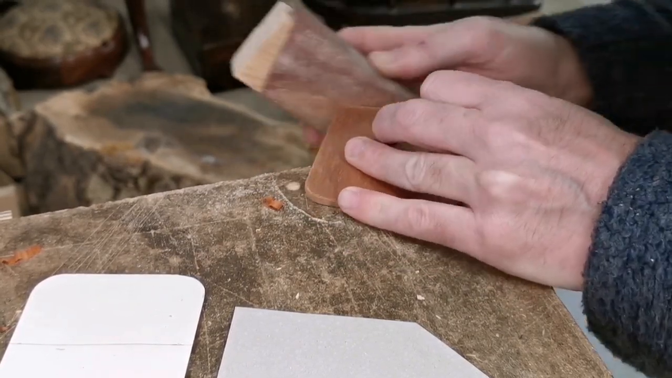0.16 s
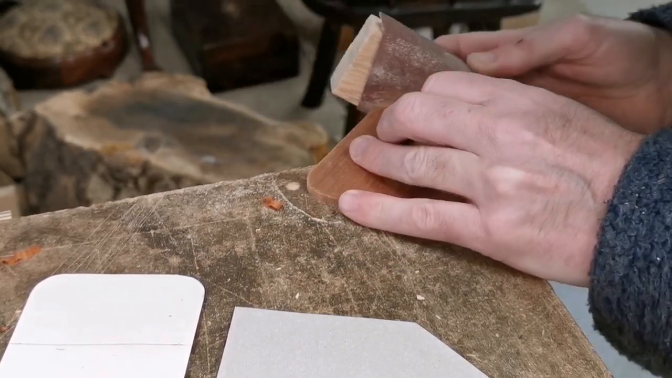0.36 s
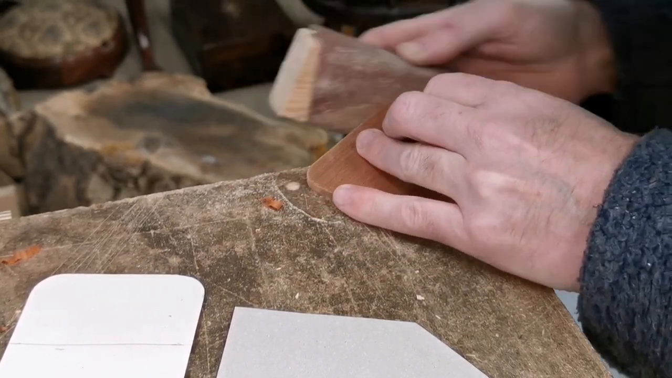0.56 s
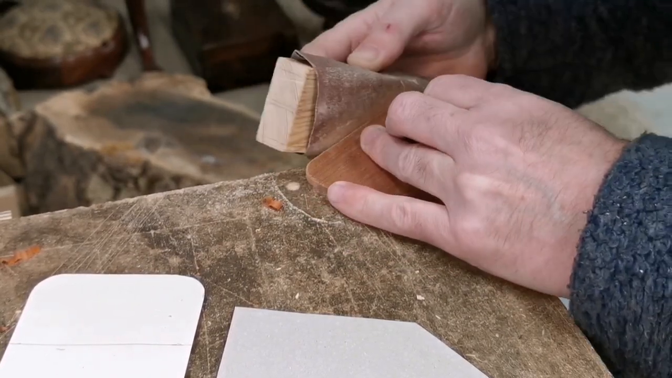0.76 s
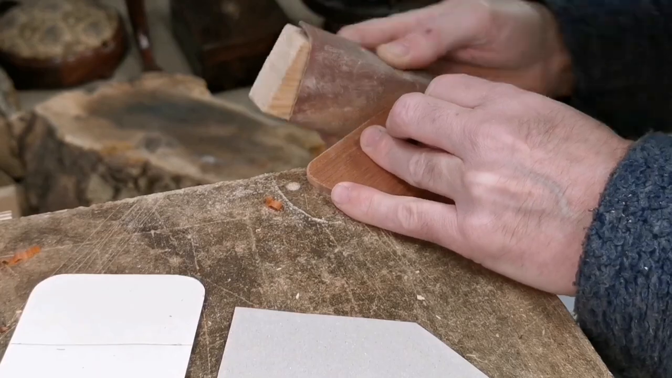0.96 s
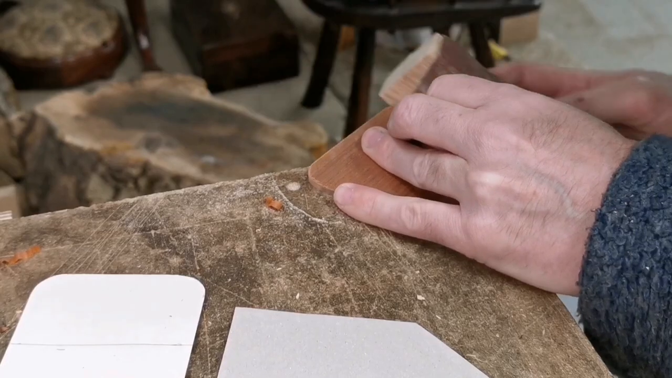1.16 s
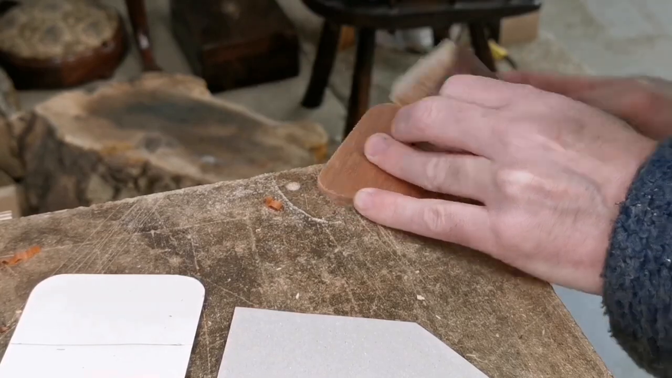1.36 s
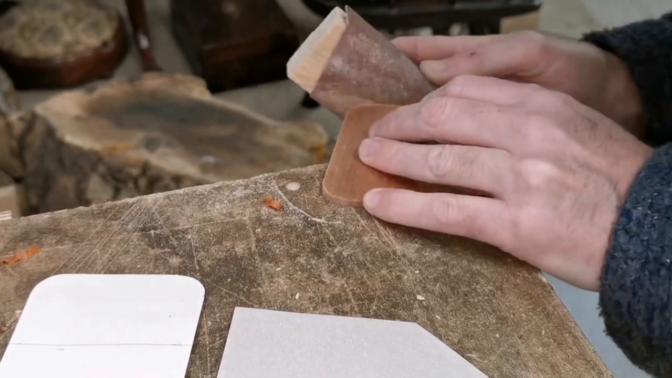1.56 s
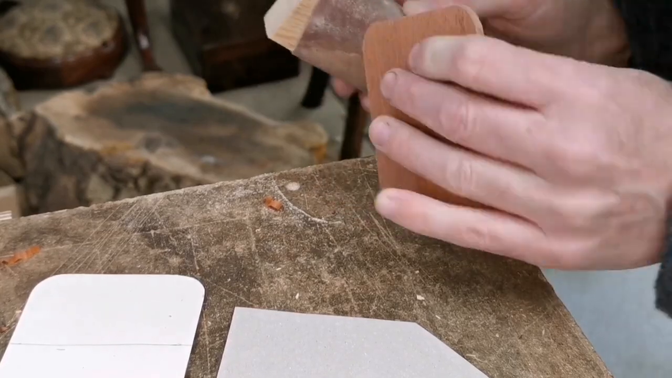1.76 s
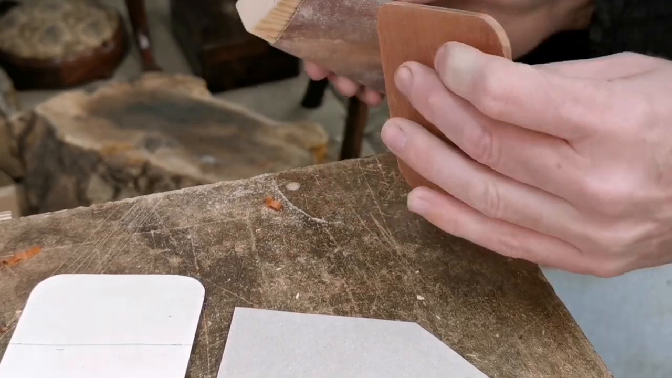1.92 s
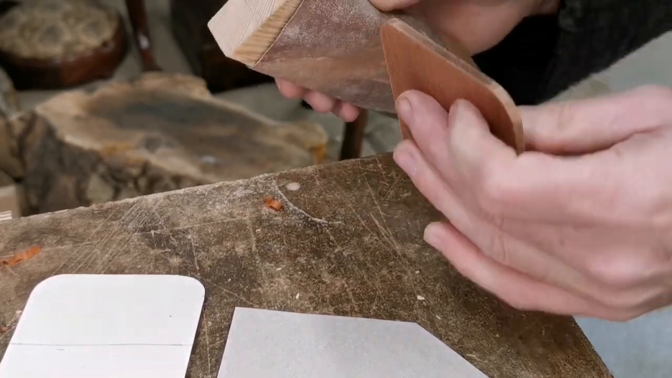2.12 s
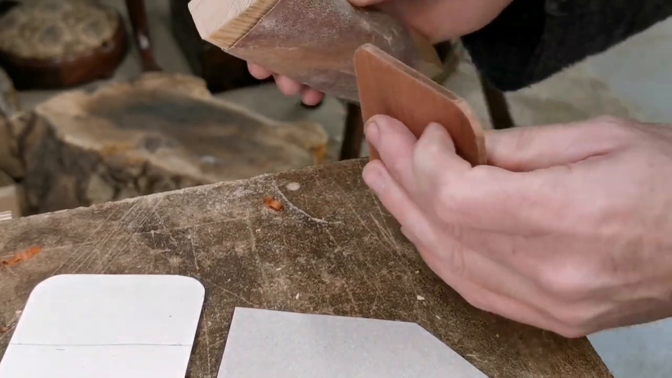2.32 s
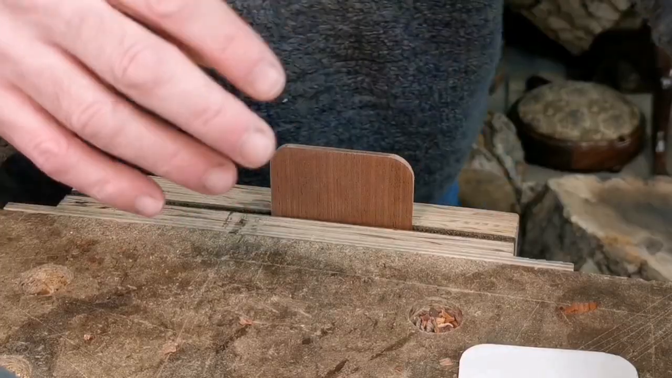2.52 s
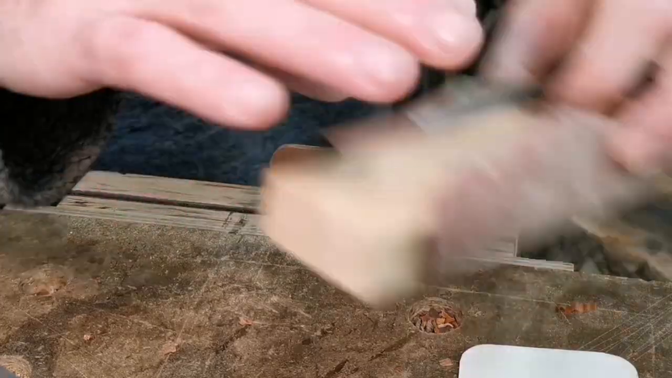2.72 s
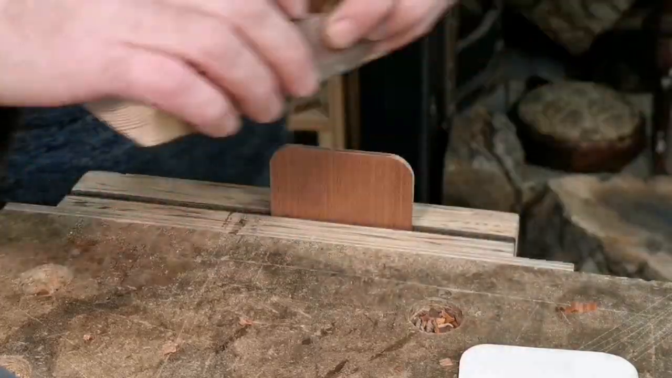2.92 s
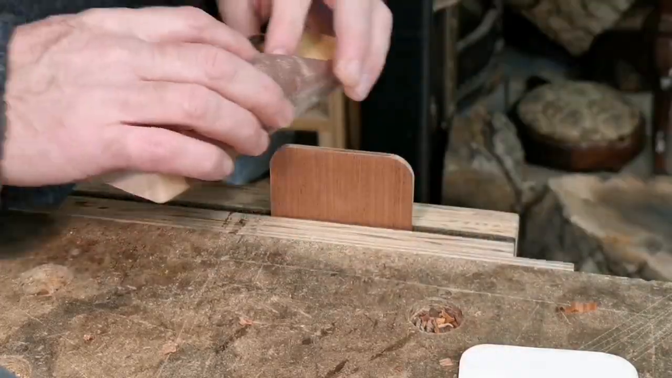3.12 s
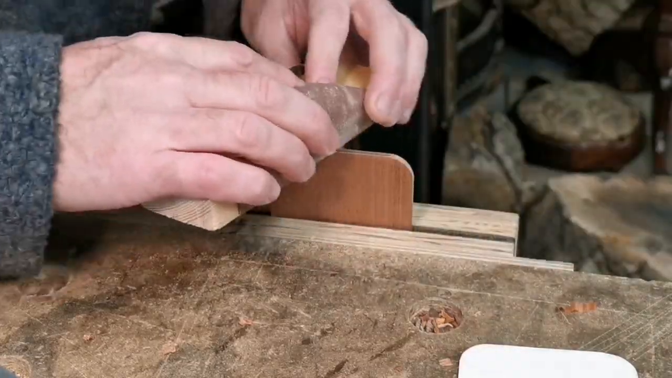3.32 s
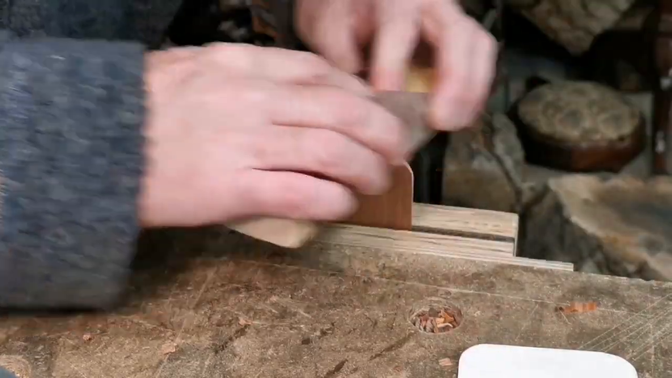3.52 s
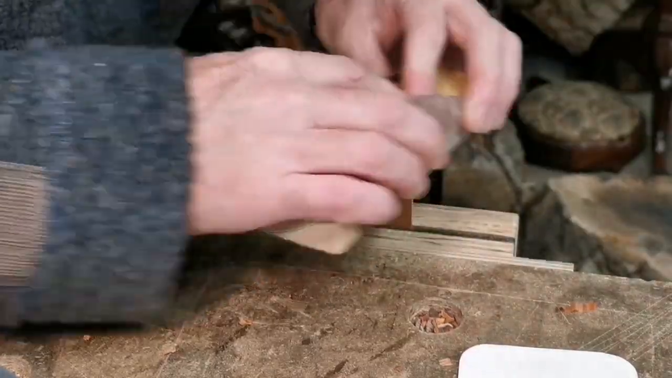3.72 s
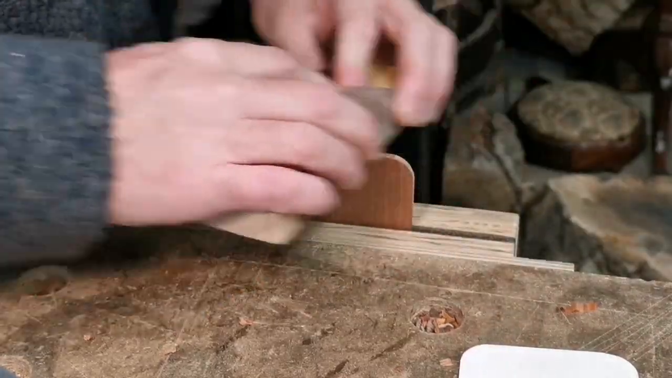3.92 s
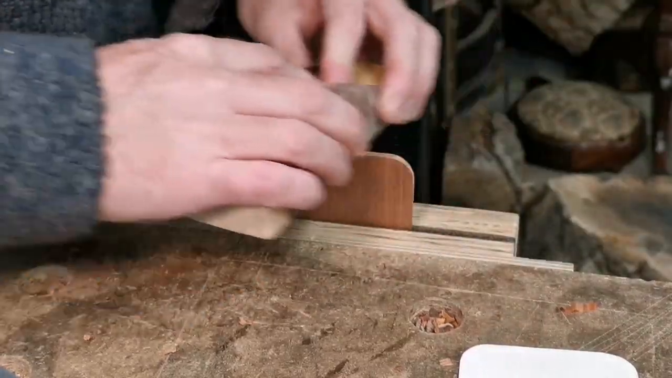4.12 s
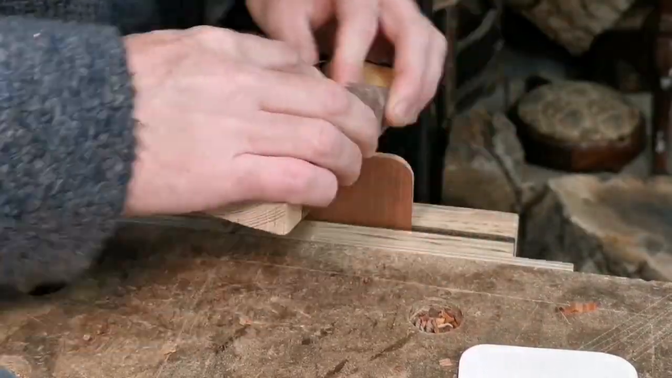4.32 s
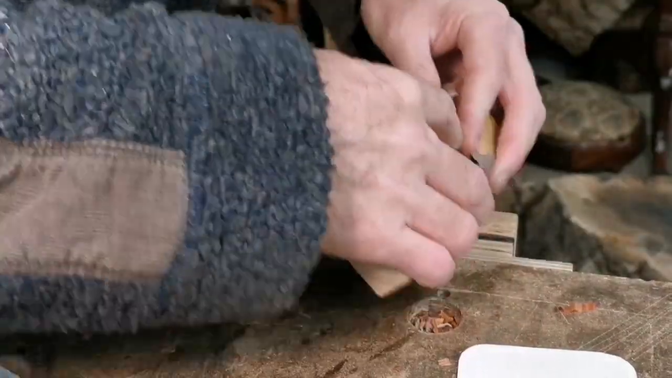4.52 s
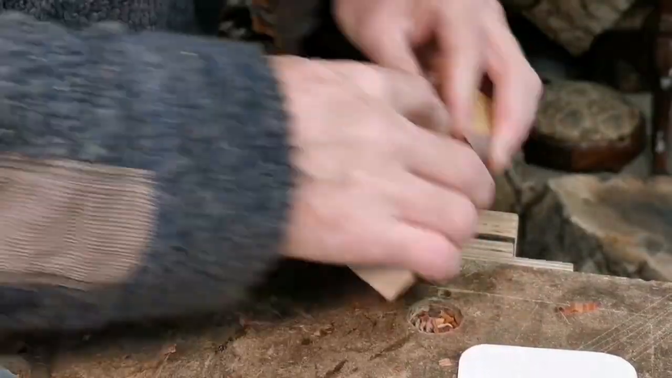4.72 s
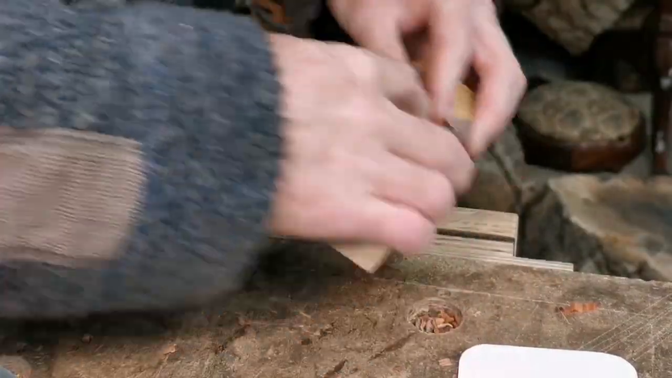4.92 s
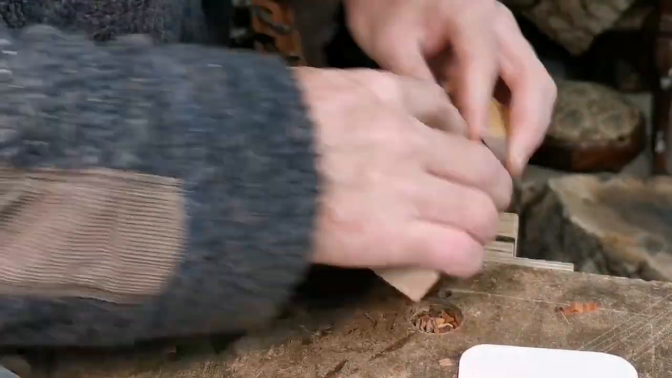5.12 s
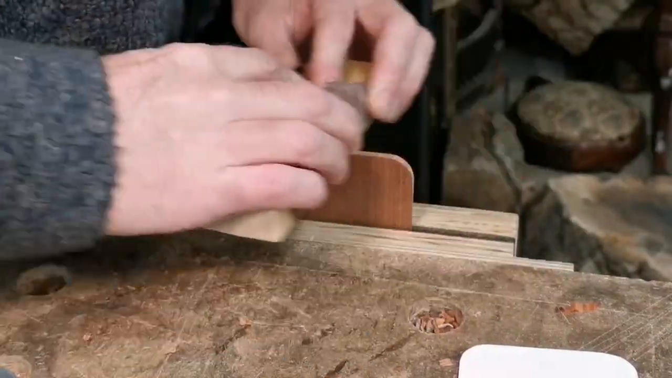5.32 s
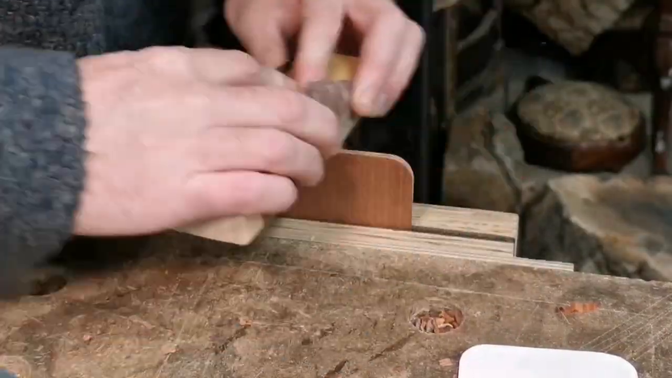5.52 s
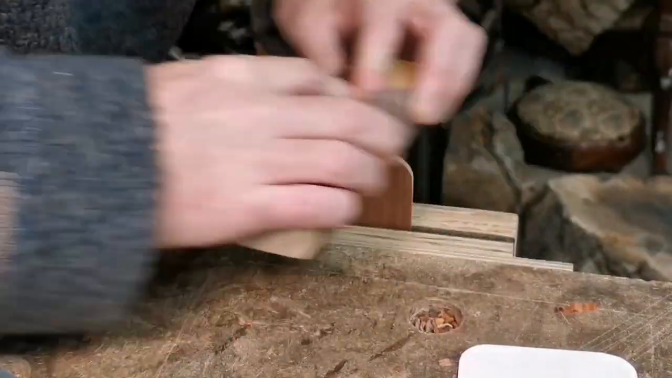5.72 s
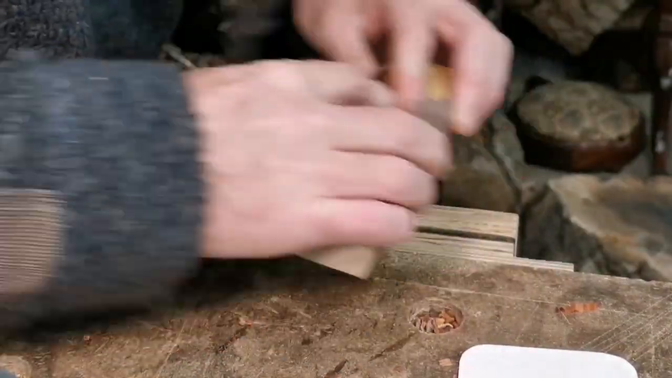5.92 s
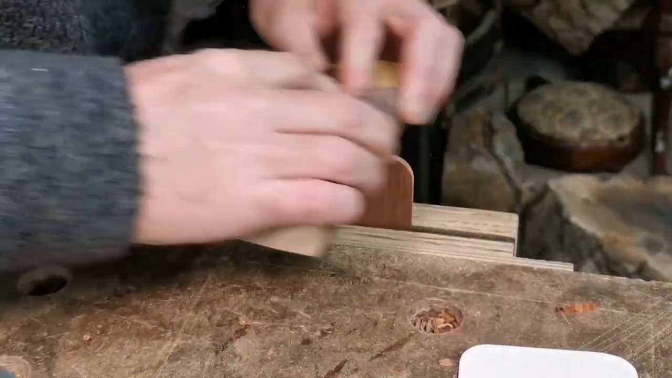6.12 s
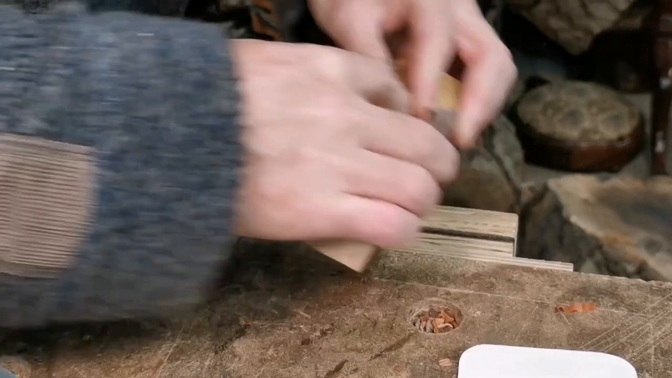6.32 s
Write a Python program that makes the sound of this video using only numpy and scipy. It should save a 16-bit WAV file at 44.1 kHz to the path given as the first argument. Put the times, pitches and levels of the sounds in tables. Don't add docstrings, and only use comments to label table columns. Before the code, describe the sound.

Close workshop sanding: a few slow gritty strokes, a soft set-down, a brief silence, loose paper scraping, then rapid steady rasping on clamped wood.

```python
import sys
import numpy as np
from scipy import signal
from scipy.fft import rfft, irfft
from scipy.io import wavfile
from scipy.ndimage import uniform_filter1d

SR = 44100
rng = np.random.default_rng(int(sys.argv[2]) if len(sys.argv) > 2 else 0)


def decibels_to_gain(level_db):
    exponent = np.asarray(level_db, float) / 20
    return 10 ** exponent


def unload_audio(sound):
    columns = np.transpose(np.atleast_2d(sound))
    steps = np.round(np.clip(columns, -1, 1) * 32767)
    wavfile.write(sys.argv[1], SR, steps.astype(np.int16))


N = 280917
T = np.arange(N) / SR
PUT_OFF_S, TOUCH_S = 1.72, 3.38
FIRST_END_S, SECOND_START_S = 2.438, 2.526
CHANGE_S = (FIRST_END_S + SECOND_START_S) / 2
# (frequency [Hz], width [Hz], level
# [dB])
HELD_MODES = [(139.2, 20, 5.5), (223, 89, -2), (318, 100, -0.5), (400, 34, 5), (500, 46, -4), (600, 68, -7),
              (681, 96, -7), (793, 52, -2.5), (1010, 360, -14)]


def evened(x):
    return x / np.sqrt(np.mean(x ** 2) + 1e-20)


def read(points, hz):
    f, value = np.transpose(points)
    return np.interp(np.log(hz + 1), np.log(f + 1), value)


def columns(rows):
    s, *values = np.transpose(rows)
    return [np.interp(T, s, v) for v in values]


def resonate(x, hz, width):
    turn = np.exp(2j * np.pi * np.cumsum(hz * np.ones(len(x))) / SR)
    r = np.exp(-np.pi * width / SR)
    return 2 * (turn * signal.lfilter([1 - r], [1, -r], x / turn)).real


def body(x, modes):
    out = np.zeros(len(x))
    for k, (hz, width, db) in enumerate(modes):
        b, a = signal.iirpeak(hz, hz / (1.55 * width), SR)
        out += (-1) ** k * decibels_to_gain(db) * signal.lfilter(b, a, signal.lfilter(b, a, x))
    return out


def grit(per_s, spread_db, dust):
    draw, size, noise = rng.random(N), rng.exponential(1, N), rng.standard_normal((2, N))
    clicks = (draw < per_s / SR) * decibels_to_gain(spread_db * np.minimum(size, 3.0)) * np.sign(noise[0])
    return evened(evened(clicks) + dust * noise[1])


def coloured(x, span, spectrum, lift_db, patchy_db, size=512):
    a, b = (min(round(s * SR), N) for s in span)
    hz, t, z = signal.stft(x[a:b], SR, nperseg=size, noverlap=3 * size // 4)
    patches = rng.standard_normal(z.T.shape).T
    patches = uniform_filter1d(patches, size=3, axis=0)
    patches = evened(uniform_filter1d(patches, size=16, axis=1))
    slope = np.tanh(np.log2((hz[:, None] + 1) / 4500))
    patches *= 1 - 0.12 * slope
    judder = evened(uniform_filter1d(rng.standard_normal(len(t)), size=4))
    patches += 0.2 * (1 + slope) * judder
    lift_db = np.interp(t + a / SR, T, lift_db * np.ones(N))
    shape = decibels_to_gain(read(spectrum, hz)[:, None] + slope * lift_db / 2)
    shape /= np.sqrt(np.mean(shape ** 2, axis=0))
    z = z * shape * decibels_to_gain(patchy_db * patches)
    out = signal.istft(z, nperseg=size, noverlap=3 * size // 4)[1][:b - a]
    return np.pad(evened(out), (a, N - b))


def swells(s, rise_s, fall_s, db, rest_db=-90, bend=2.5, trait=None):
    step = T[::64]
    late = step - np.reshape(s, (-1, 1))
    far = np.where(late < 0, -late / np.reshape(rise_s, (-1, 1)), late / np.reshape(fall_s, (-1, 1)))
    power = decibels_to_gain(np.maximum(np.reshape(db, (-1, 1)) - 30 * far ** bend, -200)) ** 2
    gain = np.interp(T, step, np.sqrt(power.sum(0) + decibels_to_gain(rest_db) ** 2))
    if trait is None:
        return gain
    return gain, np.interp(T, step, trait @ power / power.sum(0))


def hits(rows, modes, soft_s):
    out, t = np.zeros(N), np.arange(12000) / SR
    for s, db, pitch in rows:
        ring = np.zeros(len(t))
        for hz, width, mode_db in modes:
            ring += decibels_to_gain(mode_db) * np.exp(-np.pi * width * t) * np.sin(2 * np.pi * hz * pitch * t)
        ring *= (1 - np.exp(-t / soft_s)) ** 2
        at = round(s * SR)
        out[at:at + len(t)] += decibels_to_gain(db) * ring / abs(ring).max()
    return out


def tail(x, decays, first):
    taps, at = np.zeros(SR), np.arange(first, SR - 20, 20)
    taps[at + rng.integers(0, 20, len(at))] = rng.choice([-1., 1.], len(at))
    hz, t, z = signal.stft(taps, SR, nperseg=256)
    taps = signal.istft(z * decibels_to_gain(-60 * t / read(decays, hz)[:, None]), SR, nperseg=256)[1]
    return signal.fftconvolve(x, taps / np.linalg.norm(taps))[:N]


def air():
    # (frequency [Hz], level per Hz [dB])
    tone = [(53, -29), (90, -6), (114, 4), (215, -5), (251, -0.5), (405, -14.5), (562, -30), (613, -15),
            (1400, -23.5), (1780, -24.5), (15100, -31.5), (16500, -52)]
    # (time [s], rumble level [dB])
    leans = [(0.0, -61), (.4, -64), (.51, -56), (.62, -60.5), (1.1, -54), (1.6, -60), (2.1, -60),
             (2.7, -54), (2.95, -59), (3.2, -56), (3.45, -57), (3.9, -58), (4.3, -54), (4.6, -62),
             (4.95, -55), (5.4, -63), (5.85, -70), (6.2, -52)]
    rumble = evened(body(rng.standard_normal(N), [(42.2, 48, 0.0), (65.0, 20.6, 0.0031)]))
    rumble_db, = columns(leans)
    hiss = coloured(rng.standard_normal(N), (0, N / SR), tone, 0, patchy_db=1.0, size=2048)
    return decibels_to_gain(-65) * hiss + decibels_to_gain(rumble_db) * rumble


def slow_strokes():
    # (fastest at [s], rise [s], fall [s], rasp level [dB], treble lift [dB])
    strokes = [(.03, 0.36, 0.11, -28, -3.5), (.13, 0.019, 0.074, -43.5, -8),
               (0.236, 0.014, 0.011, -38.5, -22), (.33, 0.065, 0.06, -42, -5), (.41, 0.11, 0.07, -36.5, 0),
               (.49, 0.078, 0.12, -61, -16), (.607, .012, .08, -53, -9), (0.646, 0.053, .1, -41, -3.5),
               (.71, .14, 0.083, -35, -1), (.77, 0.068, 0.022, -47.5, -2), (.81, 0.068, 0.14, -58, -20.5),
               (1.051, 0.082, 0.1, -57.5, -6), (1.113, 0.018, 0.091, -40.5, 0),
               (1.15, 0.13, 0.13, -38.5, -2), (1.26, 0.22, 0.13, -34, -3.5), (1.38, 0.034, 0.067, -46, -7),
               (1.48, 0.14, 0.13, -53.5, -1)]
    # (frequency [Hz], level per Hz [dB])
    spectrum = [(410, -12), (700, -6), (788, -9), (1130, -20), (1240, -6), (1810, -5.5), (2240, 0),
                (3610, -4.5), (6800, 1.5), (8190, -7), (10800, -3.5), (13200, -11.5), (14300, -13),
                (15400, -15), (16500, -39.5)]
    # (time [s], rise [s], fall [s], level [dB])
    presses = [(0.0, .05, 0.081, -29.5), (.237, 0.016, 0.024, -39), (.33, 0.11, 0.25, -45.5),
               (.66, 0.097, .1, -55), (.74, 0.19, 0.092, -44), (1.09, 0.048, 0.11, -69),
               (1.19, 0.14, 0.22, -44.5), (1.3, 0.25, 0.23, -41), (1.42, 0.11, 0.13, -56)]
    # (time [s], level [dB])
    hum_line = [(0.0, -68.5), (0.45, -54.5), (0.656, -60), (0.78, -51), (0.838, -63), (1.006, -72),
                (1.34, -42), (1.426, -70), (1.72, -85)]
    *stroke, lift_db = np.transpose(strokes)
    level, lift_db = swells(*stroke, rest_db=-76, bend=2.0, trait=lift_db)
    rasp = coloured(grit(9000, 3.3, 1.0), (0, PUT_OFF_S), spectrum, lift_db, patchy_db=3.0)
    push = grit(600, 2.1, 1.0)
    hum = decibels_to_gain(columns(hum_line)[0]) * evened(body(push, HELD_MODES[:1]))
    too_low = signal.butter(4, 115, "high", fs=SR, output="sos")
    wood = evened(signal.sosfilt(too_low, body(push, HELD_MODES[1:])))
    wood = swells(*np.transpose(presses), rest_db=-76.0, bend=1.49) * wood
    return (level * rasp + hum + wood) * (T < PUT_OFF_S)


def snaps():
    # (time [s], peak level [dB], pitch factor [1])
    snap_rows = [
        (.2356, -19, 1.2),
        (.2364, -33, 0.92),
        (.2372, -21, 0.85),
        (2.57, -43, 2.3),
        (2.578, -35, 2.4),
        (2.592, -29, 2.13),
        (2.619, -36, 2.5),
    ]
    # (time [s], peak level [dB], pitch factor [1])
    crack_rows = [
        (.2311, -47, 0.67),
        (.2356, -23, 0.98),
        (.2369, -27, 1.2),
    ]
    # (frequency [Hz], width [Hz], level [dB])
    snap_modes = [(390, 44, -8), (1300, 790, 11), (2310, 730, 49), (3810, 680, -28), (6170, 2500, 16)]
    # (frequency [Hz], width [Hz], level [dB])
    crack_modes = [(4320, 1300, 2), (6000, 1300, 5), (9500, 4100, -20)]
    return hits(snap_rows, snap_modes, .0001) + hits(crack_rows, crack_modes, .00004)


def knocks():
    # (time [s], peak level [dB], pitch factor [1])
    knock_rows = [
        (.317, -31.5, 1.02),
        (.326, -35.5, 1.17),
        (.336, -45, 0.8),
        (.352, -31, 1.02),
    ]
    # (frequency [Hz], width [Hz], level [dB])
    knock_modes = [(291, 275, 8), (430, 190, -5), (543, 340, -3), (660, 140, -16)]
    return -hits(knock_rows, knock_modes, .0022)


def short_bursts():
    # (time [s], peak level [dB], pitch [Hz], width [Hz], length [s])
    bursts = [(0.643, -38, 1400, 400, 0.11), (0.74, -36, 1400, 400, 0.085), (1.188, -27.5, 415, 60, 0.049),
              (1.215, -28.5, 600, 70, 0.026), (1.278, -32, 606, 80, 0.092), (1.303, -34, 236, 60, 0.022),
              (1.325, -31, 143, 30, 0.048), (2.558, -37, 1880, 400, 0.011), (2.593, -31, 1800, 500, 0.026),
              (2.724, -30, 2200, 300, 0.019), (2.76, -29.5, 2210, 250, 0.016),
              (3.011, -37, 1680, 353, 0.043), (3.08, -42, 1800, 300, .025), (3.111, -37, 2100, 400, 0.032),
              (3.264, -30, 3040, 350, 0.011), (3.408, -32.5, 1300, 300, 0.035),
              (3.514, -49, 1600, 400, 0.024), (4.789, -24.5, 5350, 700, 0.012)]
    out = np.zeros(N)
    t = (np.arange(8192) - 4096) / SR
    for (s, db, hz, width, length), noise in zip(bursts, rng.standard_normal((len(bursts), 8192))):
        at = round(s * SR) - 4096
        swell = np.exp(-(np.where(t < 0, 3.0, 1.6) * t / length) ** 2)
        out[at:at + 8192] += decibels_to_gain(db - 12.5) * evened(body(noise, [(hz, width, 0)])) * swell
    return out


def lift_off():
    # (time [s], rise [s], fall [s], rasp level [dB], wood over rasp [dB])
    scrapes = [
        (1.775, 0.054, 0.072, -53.5, -19),
        (1.797, 0.018, 0.042, -47, -12),
        (1.834, 0.047, 0.034, -44, -1.5),
        (2.176, 0.0098, 0.098, -58.5, 9),
    ]
    # (frequency [Hz], level per Hz [dB])
    scrape_spectrum = [(530, -43), (900, -14.5), (1870, -13.5), (2630, -9), (4710, -13.5), (6700, -8.5),
                       (8660, -11.5), (15200, -18), (16500, -39)]
    # (frequency [Hz], level per Hz [dB])
    finger_spectrum = [(710, -48), (1200, -11.5), (1630, -23.5), (1920, -6), (2190, -16), (4050, -17),
                       (4520, -9.5), (5390, -7), (8640, -25), (14800, -28), (16500, -31)]
    # (frequency [Hz], width [Hz], level [dB])
    ring_modes = [(1290, 60, -4), (2690, 70, 3), (4150, 260, -2), (6800, 500, 0)]
    # (frequency [Hz], width [Hz], level [dB])
    wood_modes = [(300, 93, -3), (408, 46, 3.5), (560, 98, -8.5), (900, 350, -14)]
    # (time [s], peak level [dB], pitch factor [1])
    flicks = [
        (1.792, -58, 1),
        (1.828, -58, 1),
    ]
    # (frequency [Hz], width [Hz], level [dB])
    flick_modes = [(2690, 5, 0), (2640, 30, -3)]
    *gesture, wood_db = np.transpose(scrapes)
    level, wood_db = swells(*gesture, rest_db=-68.5, bend=1.84, trait=wood_db)
    level = level + decibels_to_gain(-72.5) * np.clip((T - 2.04) / 0.24, 0, 1)
    span = PUT_OFF_S, FIRST_END_S
    lift_db = np.interp(T, [1.76, 1.84], [5.0, -2.5])
    rasp = coloured(grit(7000, 0.84, 0.42), span, scrape_spectrum, lift_db, patchy_db=4.0)
    brush = coloured(grit(6600, 2.9, 1.0), span, finger_spectrum, 0, patchy_db=2.5)
    wood = evened(body(grit(440, 3.5, 0.79), wood_modes))
    wood = decibels_to_gain(wood_db) * wood * (T >= span[0]) * (T < 2.12)
    fingers = np.clip((T - 1.93) / 0.39, 0, 1)
    scrape = level * np.sqrt(1 - fingers) * rasp
    rest = level * (np.sqrt(fingers) * brush + wood)
    free = np.clip((T - 1.6) / 0.007, 0.1, 1) * np.clip((1.89 - T) / .03, 0.15, 1)
    ring = decibels_to_gain(8.0) * body(scrape * free, ring_modes)
    return (scrape + ring + rest + hits(flicks, flick_modes, 0.003)) * (T < FIRST_END_S)


def whine():
    # (time [s], pitch [Hz])
    turns = [(2.065, 12600), (2.12, 13850), (2.145, 13700), (2.2, 14100), (2.25, 13700), (2.302, 15100),
             (2.372, 12650), (2.42, 14450), (2.445, 14300)]
    s, hz = np.transpose(turns)
    place = np.interp(T, s, np.arange(len(s)))
    eased = np.floor(place) + (1 - np.cos(np.pi * (place % 1))) / 2
    hz, noise = np.interp(eased, np.arange(len(s)), hz), rng.standard_normal(N)
    partner = np.clip((T - 2.3) / .06, .15, .45)
    lines = evened(resonate(noise, hz, 25) + partner * resonate(noise, .855 * hz, 40))
    level = decibels_to_gain(-82 + np.interp(T, [2.25, 2.3], [5, 9]))
    return level * lines * np.clip((T - s[0]) / .02, 0, 1) * (T < FIRST_END_S)


def set_down():
    # (time [s], peak level [dB], pitch factor [1])
    taps = [
        (2.1722, -42.5, 1.0),
        (2.1893, -47, .85),
        (2.2160, -48, 1.0),
    ]
    # (time [s], peak level [dB], pitch factor [1])
    thumps = [
        (2.2414, -30, 1.0),
        (2.2442, -38, .5),
        (2.2488, -38, 1.5),
    ]
    # (frequency [Hz], width [Hz], level [dB])
    tap_modes = [(570, 95, 0), (1000, 220, -7)]
    # (frequency [Hz], width [Hz], level [dB])
    thump_modes = [(370, 170, 0), (770, 200, -6)]
    return hits(taps, tap_modes, .0015) - hits(thumps, thump_modes, .001)


def bench():
    # (time [s], top level [dB], legs level [dB])
    shoves = [(2.56, -70, -53), (2.83, -52, -60), (3.29, -69, -59), (3.44, -50.5, -70), (3.61, -65, -48),
              (3.67, -41, -70), (3.73, -44.5, -50), (3.84, -66, -46), (3.97, -48.5, -43),
              (4.16, -55.5, -46), (4.39, -43, -53), (4.489, -45, -74), (4.621, -36, -48.5),
              (4.77, -44, -50.5), (4.949, -45.5, -51), (5.072, -39, -52), (5.279, -35, -50),
              (5.33, -35.5, -66), (5.44, -40, -44), (5.55, -48, -42), (5.67, -49.5, -55), (5.93, -44, -51),
              (6.08, -45, -45.5), (6.31, -40, -49)]
    # (frequency [Hz], width [Hz], level [dB])
    top_modes = [(183, 64, -10), (208.5, 26, -4), (329, 120, -23.5)]
    # (frequency [Hz], width [Hz], level [dB])
    leg_modes = [(106, 40, 0.84), (143, 38, -0.85)]
    s, top_db, legs_db = np.transpose(shoves)
    rise_s, fall_s = 0.14, 0.18
    idle_db = np.where(T < TOUCH_S, -16, 0)
    top = swells(s, rise_s, fall_s, top_db, bend=0.9) + decibels_to_gain(-59.5 + idle_db)
    legs = swells(s, rise_s, fall_s, legs_db, bend=0.76) + decibels_to_gain(-57.5 + idle_db)
    push = grit(400, 0.92, 1.0)
    hum = top * evened(body(push, top_modes)) + legs * evened(body(push, leg_modes))
    return hum * (T > FIRST_END_S)


def paper_shift():
    # (time [s], rise [s], fall [s], rasp level [dB], hollow pitch [Hz])
    scrapes = [(2.59, 0.21, .1, -59, 1920), (2.69, 0.13, 0.11, -50.5, 2350),
               (2.758, 0.014, 0.02, -51.5, 2220), (2.81, 0.026, 0.042, -67.5, 2180),
               (2.875, .03, .15, -68.5, 1980), (2.969, .008, 0.032, -68, 1400),
               (3.012, 0.021, 0.044, -54.5, 1650), (3.095, 0.052, 0.17, -55.5, 2020),
               (3.21, 0.067, .1, -57.5, 2950), (3.274, 0.064, 0.11, -51, 2970),
               (3.325, 0.07, 0.094, -56.5, 2320)]
    # (frequency [Hz], level per Hz [dB])
    spectrum = [(410, -17), (700, -8.5), (842, -11), (1050, -11), (1350, -6.5), (1890, -9), (2240, -5.5),
                (3560, -8.5), (6800, -7.5), (8300, -15), (9800, -16.5), (10800, -10.5), (12000, -19),
                (15700, -22), (16500, -39)]
    # (time [s], rise [s], fall [s], wood level [dB])
    squeezes = [
        (2.6, 0.17, 0.12, -61.5),
        (2.68, 0.16, 0.087, -64),
        (2.8, 0.16, 0.22, -55),
        (3.09, 0.072, 0.074, -58.5),
        (3.274, 0.073, 0.07, -60),
    ]
    *scrape, hollow_hz = np.transpose(scrapes)
    span = SECOND_START_S - .006, TOUCH_S
    rasp = coloured(grit(2500, 1.7, 0.91), span, spectrum, 0, patchy_db=2.5)
    hollow_hz = swells(*scrape, bend=1.6, trait=hollow_hz)[1]
    rasp = evened(rasp + 0.8 * resonate(rasp, hollow_hz, 260))
    wood = evened(body(grit(500, 1.4, 0.74), HELD_MODES[1:-2]))
    squeeze = swells(*np.transpose(squeezes), rest_db=-78, bend=1.53)
    level = swells(*scrape, rest_db=-74.5, bend=2.02)
    return (level * rasp + squeeze * wood) * (T > FIRST_END_S) * (T < TOUCH_S)


def grain_ticks():
    # (time [s], peak level [dB], pitch [kHz])
    ticks = [(2.676, -40, 4.4), (2.700, -38, 2.3), (2.7555, -35, 2), (2.8105, -47, 2), (3.013, -41, 1.55),
             (3.0686, -45, 1.9), (3.0886, -40, 1.9), (3.21, -50, 2.5), (3.228, -49, 1.3), (3.248, -40, 2.8),
             (3.267, -35, 2.9)]
    # (frequency [Hz], width [Hz], level [dB])
    tick_modes = [(1000, 130, -3), (1900, 820, -6)]
    return hits(ticks, tick_modes, .0004)


def quick_strokes():
    # (turning point [s], rasp there [dB], fastest at share [0-1], rasp then [dB], wood level [dB])
    strokes = [(3.378, -61, 0.37, -41, -52.5), (3.456, -59, 0.72, -41.5, -50), (3.561, -77, 0.51, -28, -44),
               (3.697, -55, 0.49, -28, -41.5), (3.811, -51, 0.52, -29, -44.5),
               (3.936, -49, 0.43, -27, -43.5), (4.057, -50, 0.43, -28.5, -43.5),
               (4.181, -46, 0.49, -27.5, -46), (4.289, -53, 0.33, -29, -43.5), (4.425, -55, 0.6, -34, -41),
               (4.554, -51, 0.27, -32, -39), (4.72, -57.5, 0.68, -41.5, -50),
               (4.873, -56, 0.23, -34.5, -41), (5.027, -59, 0.74, -36, -45.5), (5.204, -55, 0.41, -32, -60),
               (5.362, -51, 0.64, -30.5, -38.5), (5.513, -56, 0.39, -29, -48.5),
               (5.646, -53, 0.49, -28.5, -45), (5.765, -53, 0.45, -29.5, -45), (5.902, -51, 0.57, -29, -45),
               (6.019, -53, 0.41, -29, -44.5), (6.161, -54, 0.5, -28.5, -39.5),
               (6.278, -49, 0.31, -30, -49), (6.42, -48, 0.6, -44, -48)]
    # (wandering ring [Hz], its level [dB], plate ring [dB], extra treble [dB])
    contact = [(1260, 8, -1, 4), (1560, 5, -22, 3), (1330, 0.5, 0, -5), (1300, 0.5, 3.5, 0.5),
               (1400, -6, 3, -0.5), (1400, -8, -10, 0.5), (1040, -3, 1.5, -1), (1480, -28, 3.5, 0.5),
               (1600, -9, 2, 1.5), (1030, 10, -2, 1.5), (1600, -4, 1.5, -2.5), (1520, -17, -6, 2.5),
               (1700, -2, -10, -3), (955, 7.5, -19, 1.5), (1020, -3, -1, -2), (1300, -4, -1, 1.5),
               (1090, 7, -1, -2), (1180, -4, -7, 1.5), (1090, 11, -2, -1.5), (1410, 2, -7, 3),
               (1380, 5, 2, -1), (990, 4.5, -9, -1.5), (1000, 5.5, -7, 1)]
    # (frequency [Hz], level [dB])
    upper = [(2950, -12), (3200, 0), (3020, -5), (2740, -6), (3040, -6), (3100, -26), (3070, 1.5),
             (2740, -8), (2870, -20), (3020, -7), (2980, -5), (4180, -8), (3180, -3), (4130, -1),
             (3000, -8), (3100, -5), (3080, -4), (2850, -10), (3250, -3), (3170, -5), (3200, -4.5),
             (2780, -15.5), (3190, -5)]
    # (time [s], rasp level [dB], fall [s])
    grabs = [(3.399, -43, 0.077), (3.582, -52, .08), (3.721, -34, .08), (4.751, -40.5, 0.13),
             (4.889, -46, 0.13), (5.233, -34.5, 0.12), (5.385, -37, 0.071), (5.534, -40, 0.099),
             (6.188, -46.5, .07), (3.963, -40, .07), (5.678, -43, .07), (5.792, -34, .07), (6.05, -43, .07)]
    # (frequency [Hz], level per Hz [dB])
    spectrum = [(410, -26.5), (700, -12), (1030, -13), (1890, -5), (2180, -6), (2590, -6.5), (3120, -5),
                (3850, -10), (6710, -6), (8410, -15), (10700, -7), (13000, -18), (14100, -15), (15900, -22),
                (16500, -94.5)]
    # (frequency [Hz], width [Hz], level [dB])
    vise_modes = [(326, 133, -4.5), (490, 41, 1.5), (595, 43, 3), (655, 28, 5.5), (804, 38, 2),
                  (1011, 48, 4.5)]
    # (frequency [Hz], level per Hz [dB])
    flat = [(20, 0), (20000, 0)]
    start, turn_db, share, fast_db, wood_db = np.transpose(strokes)
    wander_hz, wander_db, plate_db, extra_db = np.transpose(contact)
    upper_hz, upper_db = np.transpose(upper)
    span = start[[0, -1]]
    k = np.clip(np.searchsorted(start, T) - 1, 0, len(start) - 2)

    share = np.clip(share, .1, .9)
    knots = np.sort(np.r_[start, start[:-1] + share[:-1] * np.diff(start)])
    middle = knots[1::2]
    swing = np.interp(T, knots, np.arange(len(knots)) / 2)
    speed = abs(np.sin(np.pi * swing))

    rest = decibels_to_gain(np.interp(T, start, turn_db))
    hold = 6 * np.diff(start)[k]
    bite = speed ** np.where(swing % 1 < .5, 1.67, 2.16)
    level = rest + (decibels_to_gain(fast_db[k] - 0.76) - rest) * np.tanh(hold * bite) / np.tanh(hold)
    grab_s, grab_db, fall_s = np.transpose(grabs)
    level = np.hypot(level, swells(grab_s, .009, fall_s, grab_db, bend=1.4))

    pull = (-1) ** np.arange(len(start))
    lift_db = -1.5 + 0.51 * (fast_db + 29) + 1.5 * pull
    lift_db = np.interp(T, middle, lift_db[:-1] + extra_db) - 3 * (1 - speed)
    rasp = coloured(grit(6000, 2.7, 0.84), span, spectrum, lift_db, patchy_db=3.0)
    upper_ring = decibels_to_gain(upper_db[k]) * resonate(rasp, upper_hz[k], 280)
    wander_ring = decibels_to_gain(wander_db[k]) * resonate(rasp, wander_hz[k], 100)
    plate_ring = decibels_to_gain(plate_db[k]) * body(rasp, [(2170, 230, 0)])
    rasp = rasp + upper_ring + wander_ring + plate_ring

    wood = body(grit(700, 4.1, 0.19), vise_modes)
    wood = coloured(wood, span, flat, 0, patchy_db=4.0, size=1024)
    wood *= decibels_to_gain(np.interp(T, middle, wood_db[:-1])) * (0.16 + 0.78 * speed)
    return (level * rasp + wood) * (T >= start[0])


def block_bumps():
    # (time [s], peak level [dB], pitch factor [1])
    bumps = [
        (3.4195, -33, 1.03),
        (3.4262, -30, 0.43),
        (3.4298, -32.5, 0.83),
        (3.4365, -36, 0.93),
        (3.4415, -38, 1.14),
        (3.4505, -41, 1.16),
        (3.458, -48, 0.85),
    ]
    # (frequency [Hz], width [Hz], level [dB])
    bump_modes = [(580, 110, 3.5), (250, 130, -8)]
    return hits(bumps, bump_modes, .0008)


def stereo(mid):
    # (frequency [Hz], side over mid [dB])
    width = [(60, -11), (110, -11), (200, -11), (380, -8.5), (700, 0), (1290, 4.5), (2380, -0.5),
             (4400, 2.5), (8120, -6.5), (15000, -4)]
    # (frequency [Hz], left over right [dB])
    lean_db = [(60, 3.5), (110, 1), (200, 6), (380, -2.5), (700, -5.5), (1290, -5.5), (2380, -10),
               (4400, 0.5), (8120, -12), (15000, -17)]
    # (frequency [Hz], side level [dB])
    alike = [(5600, 0), (6600, -7), (8800, -7), (9800, 0)]
    hz = np.fft.rfftfreq(N, 1 / SR)
    scattered = tail(mid, [(100, 0.074), (15000, 0.035)], first=100)
    lean = np.tanh(read(lean_db, hz) * np.log(10) / 40)
    side = rfft(scattered) * decibels_to_gain(read(width, hz) - 5.5) + rfft(mid) * lean
    side = irfft(side * decibels_to_gain(read(alike, hz)), N) * (T < CHANGE_S)
    return np.array([mid + side, mid - side])


def scene():
    # (frequency [Hz], time to fall 60 dB [s])
    room = [(150, 0.42), (600, 0.4), (2500, 0.21), (8000, 0.24), (15000, 0.13)]
    rubbing = slow_strokes() + short_bursts() + lift_off() + paper_shift() + quick_strokes()
    snapping = snaps() + grain_ticks()
    knocking = knocks() + block_bumps()
    landing = set_down()
    sent = decibels_to_gain(-4.5) * np.roll(landing, round(.009 * SR))
    sent += decibels_to_gain(-9.5) * rubbing + decibels_to_gain(-11.0) * snapping + decibels_to_gain(-3.5) * knocking
    wet = tail(sent * (T < FIRST_END_S), room, first=200) * (T < SECOND_START_S)
    sent_later = decibels_to_gain(-11.0) * rubbing + decibels_to_gain(-4.5) * knocking
    wet += tail(sent_later * (T > FIRST_END_S), room, first=200)
    return stereo(air() + rubbing + snapping + knocking + whine() + landing + bench() + wet)


def low_pass(x):
    return signal.sosfilt(signal.butter(12, 17050, fs=SR, output="sos"), x)


def record(dry):
    # (frequency [Hz], level [dB])
    port = [(6300, -0.27), (6900, 2.5), (7500, -2), (8400, -0.75), (11800, 0.24), (12400, 4.5), (13350, 3),
            (13750, -1.5), (14350, -9), (14900, -4), (15700, 8)]
    # (frequency [Hz], level [dB])
    edge = [(15880, 2), (15950, -50)]
    # (frequency [Hz], level [dB])
    first_edge = [(15730, 0), (15790, -50)]
    hz = np.fft.rfftfreq(N, 1 / SR)
    heard = irfft(rfft(dry) * decibels_to_gain(read(port + edge, hz)), N)
    duller = irfft(rfft(heard) * decibels_to_gain(read(first_edge, hz)), N)
    heard = np.where(T < CHANGE_S, duller, heard)
    fade_s = [FIRST_END_S - .003, FIRST_END_S + 0.0027, FIRST_END_S + 0.044,
              SECOND_START_S - .004, SECOND_START_S + 0.0015]
    out_db = np.interp(T, fade_s, [-2, -8, -61.5, -74, -1.5])
    return low_pass(heard * decibels_to_gain(out_db))


dry = scene()
out = record(dry)
unload_audio(out)
```